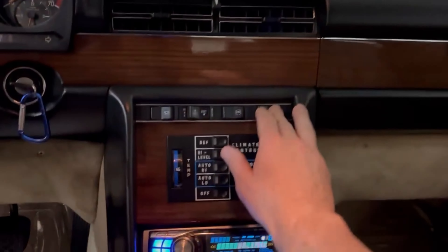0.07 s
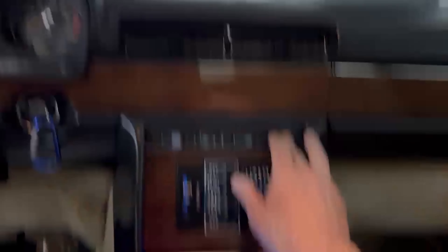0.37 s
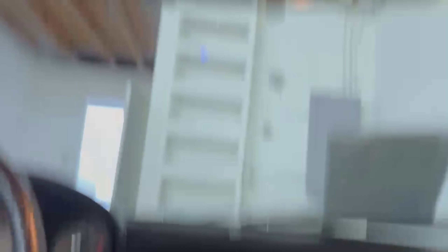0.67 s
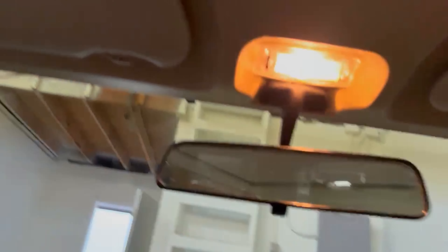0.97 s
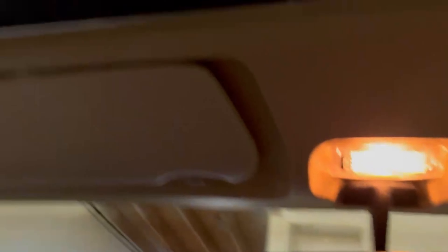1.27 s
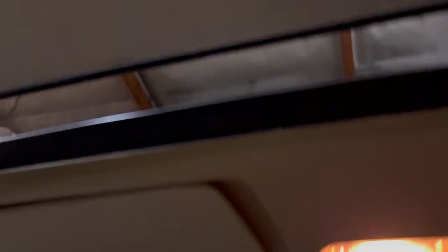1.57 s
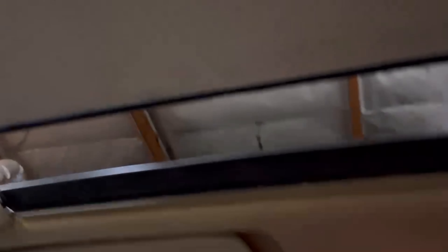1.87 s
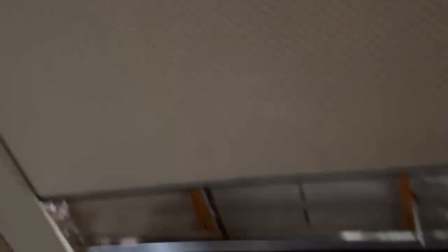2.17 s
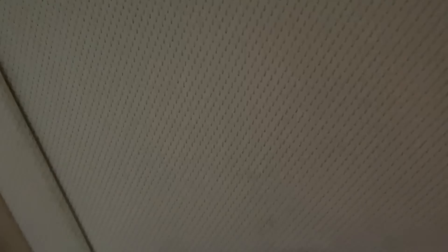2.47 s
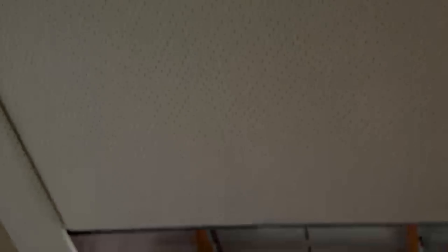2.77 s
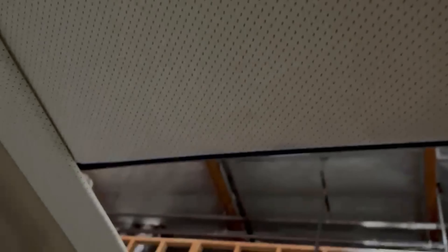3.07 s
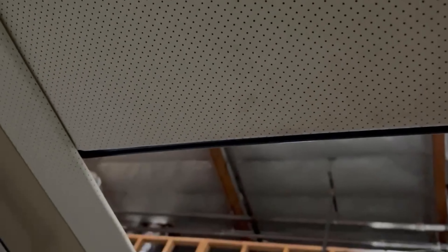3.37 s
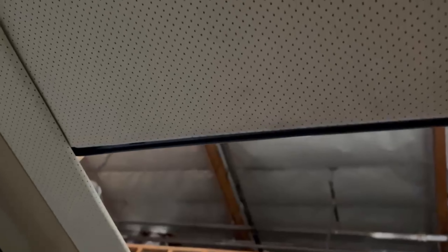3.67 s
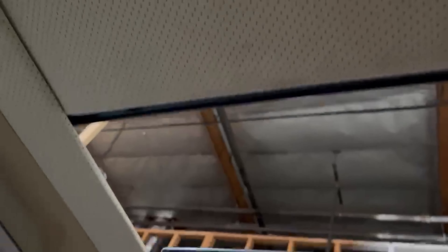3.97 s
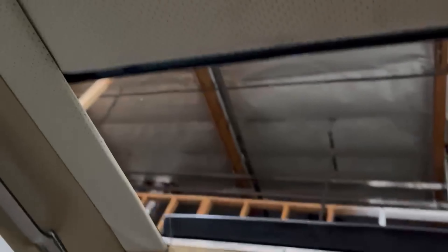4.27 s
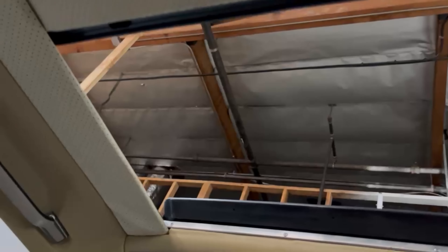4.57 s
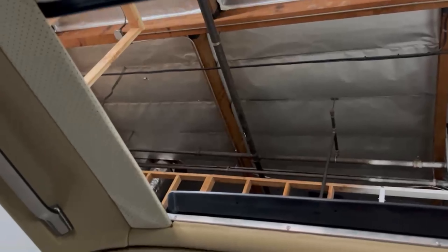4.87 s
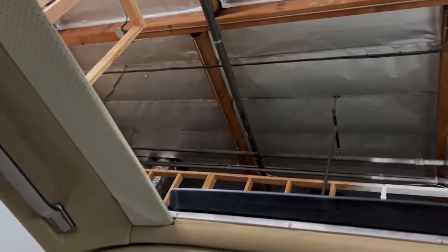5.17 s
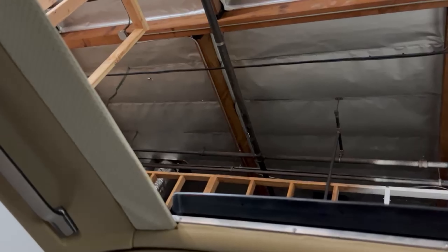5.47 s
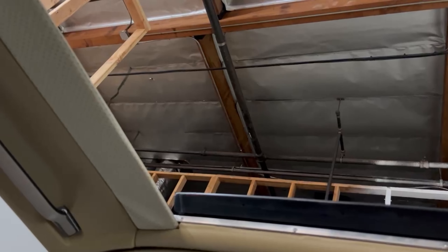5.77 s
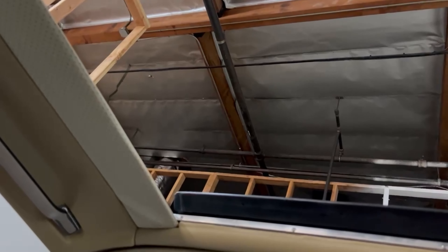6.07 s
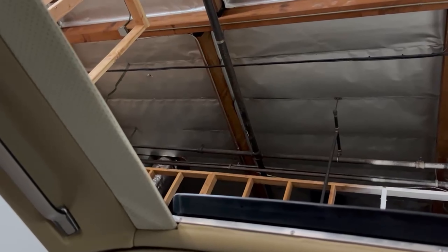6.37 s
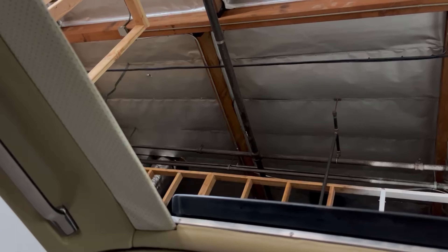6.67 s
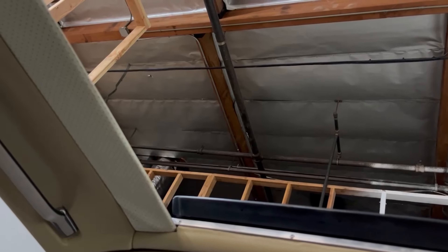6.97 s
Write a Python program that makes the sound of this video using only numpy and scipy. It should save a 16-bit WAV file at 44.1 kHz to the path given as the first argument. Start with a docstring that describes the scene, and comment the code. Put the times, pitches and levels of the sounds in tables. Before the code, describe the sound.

A dashboard switch clicks sharply right at the start, heard from the front seat of a car parked in a quiet garage. An electric sunroof motor starts humming at once, and the seal groans over a low rumble. At about 0.5 seconds the panel pulls free with a deep thud, the loudest moment, and the trim snaps and crackles until about 1.3 seconds. The panel then slides along its rails with a steady, grainy hiss over the softer, slightly wavering hum, with small knocks and shudders between 2 and 3 seconds. A few light ticks come from the track from 3.8 to 4.5 seconds. The switch clicks again at 6 seconds, and around 6.5 seconds the panel stops with a soft bump. A faint whirr with a thin whine lingers, and a last switch click and small knock come at about 7.1 seconds.

```python
"""Electric sunroof sliding open

Heard from the front seat of a car parked in a quiet garage. A dashboard switch clicks, the panel
drops out of its seal with a thud, and the trim crackles. The geared motor hums while the panel
hisses and judders along its rails to the end stop; the switch clicks again around the end of the run."""
import sys
import numpy as np
from scipy import signal
from scipy.fft import rfft, irfft, next_fast_len
from scipy.io import wavfile
from scipy.ndimage import uniform_filter1d

SR = 44100
rng = np.random.default_rng(int(sys.argv[2]) if len(sys.argv) > 2 else 0)


def output_pcm(signal):
    """Save a mono or channel-first signal as 16-bit PCM at the path in sys.argv[1].

    Samples are clipped to [-1, 1] before scaling.
    """
    pcm = np.clip(np.atleast_2d(signal).T, -1, 1) * 32767
    wavfile.write(sys.argv[1], SR, np.round(pcm).astype(np.int16))


N = 317961
TIME = np.arange(N) / SR

# motor shaft, slowing where the panel drags: time_s, speed_hz
SHAFT_SPEED = [(.1, 70), (.26, 64.3), (.42, 67.7), (.54, 57.7), (.74, 57), (.86, 72), (1.0, 72),
               (1.2, 62.5), (1.45, 64), (1.7, 63.3), (2.15, 51), (2.9, 57), (3.6, 52), (4.7, 61.4),
               (5.05, 60.5), (5.3, 55), (6.45, 55.4)]
# friction of the panel on its rails: time_s, level_db, extra_treble_db
SLIDING = [(.1, -57.5, -5), (.3, -55, 7.5), (.85, -50, 6), (1.4, -51.5, 3.5), (2.3, -50.5, 2.5),
           (2.5, -53, 3.5), (3.5, -51.5, 0), (4.2, -50, -4), (4.7, -54.5, 1.5), (6.25, -53.5, 0),
           (6.4, -52, -6), (6.5, -66, -3)]


def from_db(db):
    """Decibels to gain."""
    return np.exp(np.asarray(db) * (np.log(10) / 20))


def unit(x):
    """Scales to an rms of 1."""
    return x / np.sqrt(np.mean(x ** 2) + 1e-20)


def noise(size=N):
    """Two unrelated channels of white noise."""
    return rng.standard_normal((2, size))


def decay(t, t60):
    """A fade of 60 dB every t60 seconds."""
    return from_db(-60 * t / t60)


def follow(rows, column):
    """One column of an automation curve at every sample."""
    rows = np.array(rows)
    return np.interp(TIME, rows[:, 0], rows[:, column])


def curve_at(points, hz):
    """An EQ curve joined by straight lines over log frequency."""
    freqs, values = np.transpose(points)
    return np.interp(np.log(hz + 1), np.log(freqs + 1), values)


def bins(x):
    """The frequencies of a signal's padded spectrum."""
    return np.fft.rfftfreq(next_fast_len(x.shape[-1], True), 1 / SR)


def equalise(x, gain):
    """Filters by one gain per frequency bin."""
    size = next_fast_len(x.shape[-1], True)
    return irfft(rfft(x, size) * gain, size)[..., :x.shape[-1]]


def butter(x, order, hz, kind):
    """A low-pass or high-pass filter."""
    return signal.sosfilt(signal.butter(order, hz, kind, fs=SR, output="sos"), x)


def colour(x, tone, modes=()):
    """A broad EQ curve with resonant peaks on it; rms 1."""
    hz = bins(x)
    peaks_db = sum(lift / (1 + (2 * (hz - f) / width) ** 2) for f, width, lift in modes)
    return unit(equalise(x, from_db(curve_at(tone, hz) + peaks_db)))


def spread(pair, wider_db=0):
    """Mid and side become left and right: centred bass, wide upper range, narrower around 8-11 kHz."""
    # stereo width of the sound: freq_hz, side_to_mid_db
    width = [(30, -20), (60, -18), (120, -13), (220, -11), (380, -6.5), (700, -3), (1060, -2), (1380, 3.5),
             (1800, -1.5), (2380, -5), (4400, 0), (5600, 2), (6650, 7), (7700, -3), (8500, -6), (11000, -2),
             (13000, 1)]
    # stereo balance: freq_hz, left_to_right_db
    balance = [(60, -1.5), (110, -1.5), (200, -2.5), (380, -0.5), (700, 0.5), (1290, 0), (2380, 0.0),
               (4400, -7.5), (8120, 0), (15000, 0)]
    hz = bins(pair)
    mid, side = pair[0], equalise(pair[1], from_db(curve_at(width, hz) + wider_db))
    lean = from_db(curve_at(balance, hz) / 2)
    return np.array([equalise(mid + side, lean), equalise(mid - side, 1 / lean)])


def waver(rate_hz):
    """A random drift of rms 1, turning about rate_hz times a second."""
    knots = rng.standard_normal(4096)
    return unit(np.interp(TIME * rate_hz, np.arange(len(knots)), knots))


def add(mix, start_s, sound):
    """Lays a stereo sound into the mix."""
    part = mix[:, max(round(start_s * SR), 0):][:, :sound.shape[1]]
    part += sound[:, :part.shape[1]]


def running(start_s=0.09, rise_s=0.014, stop_s=6.475, fall_s=0.024):
    """Rise, hold and fall; by default the motor's run up to the end stop."""
    return np.clip((TIME - start_s) / rise_s, 0, 1) * np.clip((stop_s - TIME) / fall_s, 0, 1)


def strain(release_s=0.48, build_s=0.26, settle_s=0.45):
    """Builds to 1 as the panel pulls out of its seal, then dies away."""
    return np.exp(np.minimum((TIME - release_s) / build_s, (release_s - TIME) / settle_s))


def mode(hz, width_hz, t):
    """One struck resonance dying away, slightly out of step between left and right."""
    phase = rng.random() + 0.079 * rng.standard_normal((2, 1))
    return np.exp(-np.pi * width_hz * t) * np.sin(2 * np.pi * (hz * t + phase))


def cabin(pair, echo_db=-6, t60=0.072, echoes_per_s=2000):
    """Glass and trim return the sound within milliseconds and comb its upper range."""
    t = np.arange(3072) / SR
    taps = noise(len(t)) * (rng.random((2, len(t))) < echoes_per_s / SR)
    taps = butter(taps * decay(t, t60) * (t > .002), 2, 1300, "high")
    taps /= np.linalg.norm(taps, axis=1, keepdims=True)
    return pair + from_db(echo_db) * signal.oaconvolve(pair, taps, axes=1)[:, :N]


def shake(tone, modes, smooth_s, size=N):
    """Bodywork vibrating: resonant noise held at an even strength."""
    vibration = spread(colour(noise(size), tone, modes))
    power = uniform_filter1d((vibration ** 2).mean(0), max(int(smooth_s * SR), 2))
    return vibration / np.sqrt(abs(power) + 1e-9)


def shudders(rows, tone, modes, ring_width_hz, ring_db, smooth_s):
    """Brief swells of shaking, each around one note."""
    out, t = np.zeros((2, N)), np.arange(-12288, 12288) / SR
    for middle_s, length_s, db, hz in rows:
        vibration = shake(tone, [*modes, (hz, ring_width_hz, ring_db)], smooth_s, size=len(t))
        swell = np.exp2(-2 * (t / length_s) ** 2)  # above half power for length_s
        add(out, middle_s + t[0], (from_db(db) * swell * vibration)[:, middle_s + t >= 0])
    return out


def clicks(rows, tone, modes, *, rise_s, t60, body_gain_db, clack_db, crack_db, crack_t60,
           snap_gain_db, snap_decay, snap_wider_db, lift_db, ringing_db, ring_width_hz,
           cabin_db, cabin_t60):
    """A hard clack into a hollow, ringing body, with a shorter bright snap and a brief cabin tail."""
    out, t = np.zeros((2, N)), np.arange(6144) / SR
    direct = decay(t, crack_t60)
    tail = from_db(cabin_db) * decay(t, cabin_t60)
    body_fade = from_db(clack_db) * direct + decay(t, t60) + tail
    snap_fade = from_db(crack_db) * direct + decay(t, t60 * snap_decay) + tail
    attack = 1 - np.exp(-(t / rise_s) ** 2)
    for start_s, body_db, snap_db, ring_hz, ring_db in rows:
        burst = colour(noise(len(t)), tone, [*modes, (ring_hz, 0.25 * ring_hz, lift_db)])
        body = equalise(burst, 1 / (1 + (bins(burst) / 6400) ** 10))  # the snap lies above 6400 Hz
        snap = spread(unit(burst - body), snap_wider_db)
        sound = from_db(body_db + body_gain_db) * spread(unit(body)) * body_fade
        sound += from_db(snap_db + snap_gain_db) * snap * snap_fade
        sound += from_db(ring_db) * mode(ring_hz, ring_width_hz, t)
        for hz, width, lift in modes:
            sound += from_db(body_db + ringing_db + lift) * mode(hz, width, t)
        add(out, start_s, sound * attack)
    return out


def garage_air(level_db=-70.5):
    """The room tone of the still garage."""
    # tone of the air: freq_hz, level_db
    tone = [(100, -19), (300, 2), (600, -13.5), (1200, -7.5), (2600, -26.5), (4000, -32), (8000, -40),
            (12000, -42), (16000, -55)]
    return from_db(level_db) * spread(colour(noise(), tone))


def body_rumble(rest_db=-51, strain_db=15, heave_db=-2):
    """The car body rumbles softly, more under the strain of the seal, and heaves now and then."""
    # tone of the rumble: freq_hz, level_db
    tone = [(16, -11), (28, -3), (48, -0.5), (64, 1.5), (88, -3.5), (115, -7.5), (150, -13), (220, -27.5),
            (500, -80.5)]
    # deep heaves: middle_s, length_s, level_db, ring_hz
    heaves = [(.12, 0.027, -31.5, 85), (0.19, 0.05, -30.5, 61.6), (0.277, 0.034, -26, 47.6),
              (0.35, 0.099, -22.5, 28.9), (.445, 0.043, -16.5, 30.3), (0.505, 0.076, -21, 64),
              (.66, 0.21, -32, 45), (1.32, 0.083, -39, 55), (1.898, 0.071, -41, 62.06),
              (2.272, 0.15, -39, 45.6), (5.675, 0.044, -45.5, 54.9), (6.45, 0.14, -45, 55.98),
              (7.196, 0.075, -37, 57.5)]
    rumble = shake(tone, [], smooth_s=0.1) * from_db(rest_db + strain_db * strain() * running())
    heaving = shudders(heaves, tone, [], ring_width_hz=22, ring_db=9, smooth_s=0.054)
    return rumble + from_db(heave_db) * heaving


def lingering_whine(whirr_start_s=6.4, whirr_db=-61):
    """As the panel comes to rest, a soft whirr lingers with a thin tone that rises and levels off."""
    # the thin tone: time_s, pitch_hz, level_db
    glide = [(6.5, 993, -85), (6.57, 1048, -74), (6.7, 1145, -72.5), (6.85, 1150, -75), (7.0, 1150, -78.5)]
    # tone of the whirr: freq_hz, level_db
    whirr_tone = [(150, -10), (340, 4), (560, -0.5), (760, -11), (1150, -12.5), (2000, -22.5),
                  (3000, -48.5), (5000, -44), (12000, -68)]
    pitch = follow(glide, 1) * (1 + 0.0057 * waver(55))
    gate = (TIME > glide[0][0]) & (TIME < glide[-1][0])
    whine = np.sqrt(2) * from_db(follow(glide, 2)) * gate * np.sin(2 * np.pi * np.cumsum(pitch) / SR)
    whirr = spread(colour(cabin(noise()), whirr_tone))
    return whine + whirr * from_db(whirr_db) * (TIME > whirr_start_s)


def trim_crackles():
    """Latch, seal and trim snap and crackle, mostly as the panel pulls free."""
    # crackles: start_s, body_db, snap_db, ring_hz, ring_db
    hits = [(.124, -43.5, -47, 4900, -47), (.199, -48.5, -62, 1660, -48), (.356, -41.5, -77, 1780, -44),
            (.391, -35, -77, 1820, -29), (.434, -30.5, -49.5, 2400, -34), (.717, -34, -35.5, 4730, -41),
            (.721, -36, -49, 1440, -39), (.774, -39, -69, 1254, -31), (.856, -35.5, -41, 4840, -46),
            (.974, -38.5, -59, 1210, -54), (1.030, -39, -47, 1402, -51), (1.084, -39, -52, 1111, -45),
            (1.131, -37, -52, 1150, -42), (1.180, -40.5, -53, 1190, -45), (1.231, -42, -51, 4630, -56),
            (1.309, -41, -48, 4770, -59), (2.286, -41.5, -52, 1663, -44), (7.181, -53, -69, 3580, -59.5)]
    # tone of the crackles, with a gap near 12.5 kHz that is not the trim's own: freq_hz, level_db
    tone = [(250, 8), (800, 7), (1600, 6), (3000, -2.5), (4800, -4), (6700, -8), (8300, -3.5),
            (10500, -1.5), (12500, -30), (15000, -6), (17000, -22)]
    # modes of the trim: freq_hz, width_hz, lift_db
    modes = [(1150, 220, -1), (5046, 650, -1), (8000, 850, 4.5)]
    return clicks(hits, tone, modes, rise_s=0.0012, t60=0.094, body_gain_db=0.5, clack_db=-10,
                  crack_db=-1, crack_t60=0.0089, snap_gain_db=-2.5, snap_decay=0.85, snap_wider_db=-1,
                  lift_db=4.5, ringing_db=-7.5, ring_width_hz=55, cabin_db=-18, cabin_t60=0.37)


def track_ticks():
    """The panel's shoes tick over joints in the track."""
    # ticks: start_s, body_db, snap_db, ring_hz, ring_db
    hits = [(3.8405, -45, -52.5, 1070, -39.5), (3.953, -51, -65, 1097, -50),
            (4.1727, -41.5, -41.5, 1040, -33), (4.179, -42, -54, 1214, -45),
            (4.319, -42.5, -48, 1050, -37.5), (4.452, -49, -73, 1230, -45)]
    # tone of the ticks, with a gap near 12.5 kHz that is not the track's own: freq_hz, level_db
    tone = [(200, -3), (900, 7), (2000, 10), (3500, -7.5), (5000, -6), (6700, -12), (8500, 2), (10500, -7),
            (12500, -21), (15000, -6), (17000, -21)]
    # modes of the track: freq_hz, width_hz, lift_db
    modes = [(786, 50, 8), (1214, 74, -1), (1410, 62, -7), (1950, 125, -2), (4900, 294, 5),
             (8000, 560, 9.5), (8790, 300, 3)]
    return clicks(hits, tone, modes, rise_s=0.00047, t60=0.055, body_gain_db=-3, clack_db=-9,
                  crack_db=2, crack_t60=0.0089, snap_gain_db=-5, snap_decay=0.6, snap_wider_db=0,
                  lift_db=8, ringing_db=-9, ring_width_hz=49, cabin_db=-12.5, cabin_t60=0.17)


def switch_clicks():
    """The dashboard switch snaps over and rings its hollow mounting."""
    # clicks: start_s, body_db, snap_db, ring_hz, ring_db
    hits = [(.024, -74, -98, 1450, -59), (.0898, -53, -45, 1410, -35), (.0928, -38.5, -29.5, 1900, -35),
            (5.9925, -39, -48, 900, -49), (6.755, -76.5, -92, 4900, -78), (6.887, -57, -83, 1410, -65),
            (7.095, -58, -72, 1410, -52), (7.1015, -37.5, -39.5, 1387, -41)]
    # tone of the clicks, with a gap near 12.5 kHz that is not the switch's own: freq_hz, level_db
    tone = [(200, -15), (900, -2), (1500, 2), (2300, 0.5), (4000, -6.5), (6700, -6), (8500, 8), (10800, 9),
            (12500, -28.5), (15000, 5), (17000, -16.5)]
    # modes of the switch and its mounting: freq_hz, width_hz, lift_db
    modes = [(1450, 110, 10), (890, 140, 5), (1824, 57, 8), (2002, 60, 5), (2380, 55, -1.5), (2540, 60, 9),
             (2860, 41, 0.5), (3290, 80, -0.5), (4060, 150, -1.5), (4900, 80, 4), (8060, 1100, 4.5),
             (9700, 500, 5.5)]
    return clicks(hits, tone, modes, rise_s=0.00064, t60=0.083, body_gain_db=0.5, clack_db=-4.5,
                  crack_db=8.5, crack_t60=0.011, snap_gain_db=-2.5, snap_decay=0.62, snap_wider_db=-2,
                  lift_db=11.5, ringing_db=-13.5, ring_width_hz=63, cabin_db=-14, cabin_t60=0.19)


def panel_knocks(rise_s=0.00036, damping_hz=900, thud_db=-2, ringing_db=-13, note_decay=1.11):
    """A blow gives a short thud and leaves the panel ringing, most on the note of the struck spot."""
    # blows: start_s, level_db, depth_hz, brightness_hz, t60_s, ring_hz, ring_db
    blows = [(0.097, -42, 82.7, 406, 0.79, 380, -56), (0.433, -27, 85, 1100, 0.22, 112, -18),
             (.451, -26.5, 130, 650, 0.19, 198.6, -22), (.468, -31, 120, 330, .3, 141, -23.5),
             (0.484, -28, 60, 110, 0.25, 65, -11.5), (.769, -32, 120, 420, 0.088, 122, -24),
             (1.131, -39, 260, 900, 0.069, 734, -39), (2.179, -38.5, 69.1, 700, 0.061, 847, -35),
             (2.287, -47, 90, 550, 0.055, 470, -37.5), (2.733, -40.5, 229.7, 480, 0.11, 242.5, -36.5),
             (2.968, -52, 210, 600, 0.078, 323, -37.5), (2.988, -41, 210, 601, 0.13, 247, -35),
             (4.362, -57, 150, 456, 0.23, 322, -47), (4.385, -42, 171, 450, 0.17, 204.5, -37.5),
             (4.556, -46, 180, 451, 0.13, 210, -39), (5.994, -46, 190, 899, 0.14, 459, -50),
             (6.398, -40, 191.6, 450, 0.094, 232, -36), (6.438, -47, 90, 447, 0.12, 460, -43.5),
             (6.495, -45, 90, 300, 0.11, 225, -42.5), (7.108, -38, 89, 260, 0.12, 279.6, -50)]
    # modes of the roof panel: freq_hz, width_hz, lift_db
    modes = [(65, 10, 15), (112.8, 5.5, 10), (141, 7, 11.5), (201, 27, 6), (268, 20, 6), (322, 17, 5),
             (420, 19, 3), (530, 40, 4.5), (810, 40, 6), (876, 57, 12), (1025, 120, 8), (1225, 80, 7)]
    out, t = np.zeros((2, N)), np.arange(16384) / SR
    for start_s, db, low_hz, bright_hz, t60, ring_hz, ring_db in blows:
        tone = [(low_hz / 3, -35), (low_hz, 0),
                (bright_hz, -6), (4 * bright_hz, -25), (30 * bright_hz, -70)]
        thud = from_db(thud_db) * spread(colour(noise(len(t)), tone, modes), wider_db=1)
        low = butter(thud, 2, damping_hz, "low")
        sound = low * decay(t, t60) + (thud - low) * decay(t, t60 / 2)  # highs die twice as fast
        for hz, width, lift in modes:
            fade = from_db(ringing_db + lift + curve_at(tone, hz)) * np.exp(-np.pi * width * t)
            sound += fade * np.sin(2 * np.pi * (hz * t + rng.random()))
        note = from_db(ring_db) * decay(t, note_decay * t60) * np.sin(2 * np.pi * ring_hz * t)
        add(out, start_s, (from_db(db) * sound + note) * (1 - np.exp(-t / rise_s)))
    return out


def panel_judder(rest_db=-66, sliding_db=-58, strain_db=18, catch_db=-1):
    """The moving panel trembles; wherever it catches on its rails, it shudders around one note."""
    # tone of the trembling: freq_hz, level_db
    tone = [(90, -30.5), (140, -0.5), (230, 1), (285, -2), (320, -5.5), (370, -3), (470, -8.5), (650, -15),
            (1500, -26.5), (4000, -94)]
    # ringing of the panel: freq_hz, width_hz, lift_db
    modes = [(128.7, 6.5, 15), (221, 21, 4), (262, 3.3, 4), (324, 11, 0.5), (408, 30, -1)]
    # catches: middle_s, length_s, level_db, ring_hz
    catches = [(.13, 0.034, -41, 392), (.42, 0.15, -39.5, 405), (.54, 0.062, -38.5, 268),
               (.6, 0.12, -39, 141), (.785, 0.043, -38, 123), (1.88, 0.072, -45, 128),
               (2.23, 0.08, -46.5, 117), (2.75, 0.048, -46.5, 246), (3.0, 0.082, -45.5, 314.3),
               (3.31, 0.069, -45.5, 227), (3.73, 0.05, -49, 144.1), (4.07, 0.075, -46.5, 240),
               (4.39, 0.063, -42.5, 200), (4.58, 0.057, -47.5, 214), (6.44, 0.043, -44.5, 236),
               (6.54, 0.074, -52, 226), (7.18, 0.051, -39.5, 185)]
    tremble = from_db(rest_db) + from_db(sliding_db + strain_db * strain()) * running()
    catching = shudders(catches, tone, modes, ring_width_hz=31, ring_db=12.5, smooth_s=0.044)
    return shake(tone, modes, smooth_s=0.091) * tremble + from_db(catch_db) * catching


def scrapes(skirt_db=-16):
    """The panel's edge, or a finger on the switch, rubs in short swells, each around one pitch."""
    # strokes: start_s, length_s, level_db, pitch_hz
    strokes = [(0.421, 0.023, -47, 2300), (0.798, 0.21, -54, 3350), (0.63, 0.087, -50.5, 1715),
               (1.55, .42, -53.5, 510), (2.916, 0.13, -50.5, 881), (3.899, .45, -54, 1150),
               (3.901, .45, -61, 2070), (4.331, 0.28, -63, 1093), (6.319, 0.085, -58.5, 2430),
               (6.314, 0.074, -50, 437), (7.131, 0.11, -63.5, 2400)]
    out = np.zeros((2, N))
    for start_s, length_s, db, hz in strokes:
        swell = np.hanning(round(length_s * SR))
        tone = [(hz / 8, -50), (hz / 2, skirt_db), (hz, 0), (hz * 2, skirt_db), (hz * 8, -50)]
        add(out, start_s, from_db(db) * swell * spread(colour(noise(len(swell)), tone)))
    return out


def grit(level_db=-9, specks_per_s=260, scatter_db=2.5):
    """Specks tick under the shoes; each rings one resonance of the rails, which grains the hiss."""
    # struck resonances: freq_hz, width_hz, relative_db
    modes = [(860, 82, -4.5), (1175, 86, -4), (1875, 120, -8.5), (2400, 230, -9), (5000, 280, -16)]
    out, t = np.zeros((2, N)), np.arange(1024) / SR
    for hz, width, db in modes:
        struck = rng.random(N) < specks_per_s / SR
        force = from_db(scatter_db * np.minimum(rng.exponential(1, N), 3.5))
        specks = struck * force * rng.choice([-1, 1], N)
        out += from_db(db) * unit(signal.oaconvolve(specks[None], mode(hz, width, t), axes=1)[:, :N])
    return out * from_db(level_db + follow(SLIDING, 1)) * running()


def singing_shoes(level_db=-0.5, wander=0.045, wander_hz=7, swell_db=1, swell_hz=14):
    """Stick and slip make the shoes sing roughly; each note drifts in pitch and level."""
    # notes of the shoes: pitch_hz, width_hz, relative_db
    notes = [(470, 51, -17.5), (879.5, 60, -13.5), (1076, 62, -14.5), (1900, 116, -19)]
    out = np.zeros((2, N))
    for hz, width, db in notes:
        pole = np.exp(-np.pi * width / SR)
        smoothing = [1 - pole], [1, -pole]
        slips = signal.lfilter(*smoothing, signal.lfilter(*smoothing, noise()))
        angle = 2 * np.pi * np.cumsum(hz * (1 + wander * waver(wander_hz))) / SR
        out += from_db(db) * unit(slips * np.sin(angle) * from_db(swell_db * waver(swell_hz)))
    return spread(out) * from_db(level_db + follow(SLIDING, 1)) * running()


def rail_hiss(turns, level_db=-1.6, teeth=6, mesh_depth=0.13, grain_db=0.85, flutter_db=0.45):
    """Tiny slips of shoes and drive cable, pulsed by the gear, ring the rails."""
    # tone of the hiss, with a gap near 12.5 kHz that is not the rails' own: freq_hz, level_db
    tone = [(210, -46), (350, -15), (459, -6), (600, -7.5), (740, -2.5), (880, 1.5), (1090, -2), (1500, -5),
            (1910, -5), (2500, -9), (3340, -18), (4900, -16.5), (6640, -30), (7900, -24), (9750, -25),
            (12200, -46), (15000, -36.5)]
    # resonances of the rails and gear housing: freq_hz, width_hz, lift_db
    modes = [(454.6, 51, -0.5), (548, 30, 3.5), (746, 50, -3.5), (840, 150, 4.5), (1220, 250, 3.5),
             (1590, 170, -0.5), (1900, 120, -1), (2450, 150, 0), (4330, 120, -2.5), (5130, 220, -2.5),
             (8000, 220, 0), (8900, 94, -2)]
    gear_pulse = 1 + mesh_depth * np.cos(2 * np.pi * teeth * turns)
    slips = noise() * from_db(grain_db * waver(500)) * gear_pulse
    hiss = colour(cabin(slips), tone, modes)
    treble = signal.sosfiltfilt(signal.butter(1, 3000, "high", fs=SR, output="sos"), hiss)
    hiss += (from_db(follow(SLIDING, 2)) - 1) * treble
    level = from_db(level_db + follow(SLIDING, 1) + flutter_db * waver(30))
    return spread(hiss) * level * running(start_s=0.089, stop_s=6.49, fall_s=0.067)


def seal_groan(turns, level_db=-36):
    """The seal groans on the shaft's third order until the panel is free."""
    fade = running(start_s=0.17, rise_s=0.16, stop_s=0.86, fall_s=0.25)
    return from_db(level_db) * fade * np.sqrt(2) * np.sin(2 * np.pi * 3 * turns)


def motor_hum(turns, level_db=-2, usual_db=-50, load_share=0.31):
    """Twenty shaft orders swell and fade as the load on the gear shifts; the seal's groan joins them."""
    # strength of the orders in the cabin: freq_hz, level_db
    tone = [(45, -12.5), (68, -1), (90, -7.5), (115, -7), (160, -14), (245, -7), (300, -17.5), (380, -20),
            (450, -14.5), (560, -19.5), (680, -24.5), (860, -28), (1100, -22.5), (1400, -14.5)]
    # load on the motor, heavy until the panel clears its seal: time_s, level_db
    load = [(.1, -32), (.75, -34.5), (.88, -29.5), (1.55, -37), (2.1, -44), (2.9, -42.5), (3.5, -84),
            (4.7, -42.5), (5.4, -51), (6.45, -47)]
    hop = 256
    speed_hz, load_db = follow(SHAFT_SPEED, 1)[::hop], follow(load, 1)[::hop]
    hum = np.zeros(N)
    for order in range(1, 21):
        # a hard-working motor gains mostly in its first order, which also wavers least
        order_db = load_db if order == 1 else usual_db + load_share * (load_db - usual_db)
        unsteady = 0.25 if order == 1 else 0.51
        strength = from_db(level_db + order_db + curve_at(tone, order * speed_hz))
        partial = np.sin(2 * np.pi * (order * turns + rng.random()))
        hum += np.interp(TIME, TIME[::hop], strength) * (1 + unsteady * waver(9)) * partial
    return (hum + seal_groan(turns)) * running() * from_db([[-.6], [.6]])  # a little to the right


def scene():
    """Drive, switch, trim and roof in the cabin; one shaft times both the hum and the gear's pulse."""
    turns = np.cumsum(follow(SHAFT_SPEED, 1) * (1 + 0.00904 * waver(25))) / SR
    drive = motor_hum(turns) + rail_hiss(turns) + singing_shoes() + scrapes() + lingering_whine()
    small_parts = switch_clicks() + trim_crackles() + track_ticks() + grit()
    bodywork = body_rumble() + panel_judder() + panel_knocks()
    return drive + small_parts + bodywork + garage_air()


def record(dry, low_cut_hz=20, high_cut_hz=16000):
    """Sound reaches the left microphone port a little late; both ends of the range are then cut."""
    # lag of the left port behind the right: freq_hz, phase_rad
    port_lag = [(0, 0.15), (1000, 0.079), (4500, 0.19), (8000, 0), (16000, 0.5)]
    hz = bins(dry)
    left = equalise(dry[0], np.exp(-1j * np.interp(hz, *np.transpose(port_lag))))
    ports = equalise(np.array([left, dry[1]]), 1 - 1 / (1 + (hz / low_cut_hz) ** 8))
    high_cut = signal.firwin(511, high_cut_hz, window=("kaiser", 9), fs=SR)
    return signal.oaconvolve(ports, high_cut[None], "same")


dry = scene()
out = record(dry)
output_pcm(out)
```